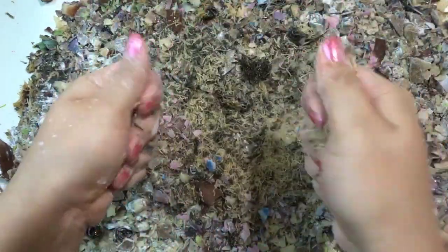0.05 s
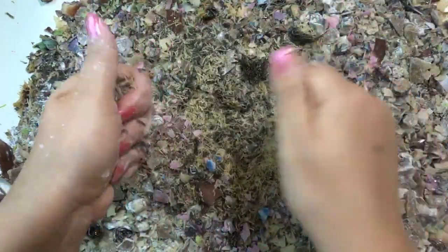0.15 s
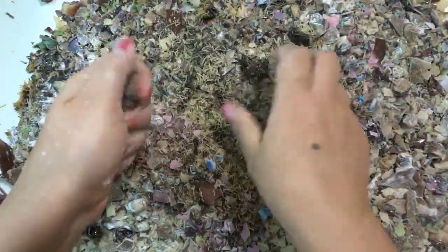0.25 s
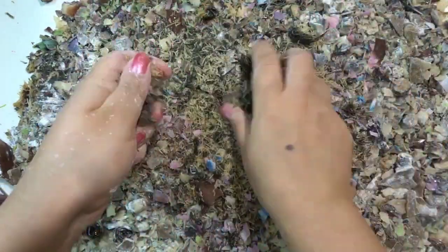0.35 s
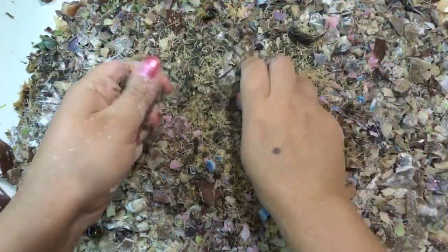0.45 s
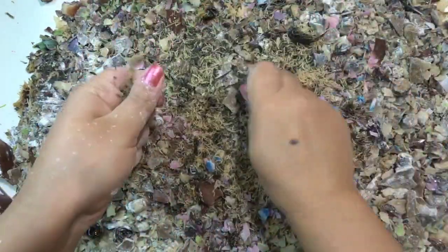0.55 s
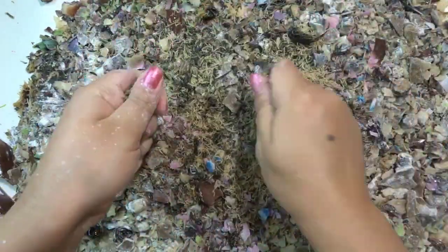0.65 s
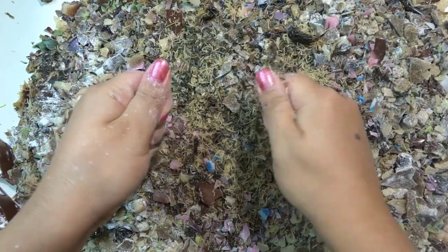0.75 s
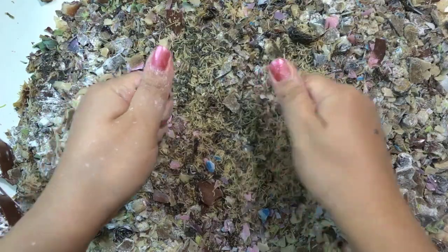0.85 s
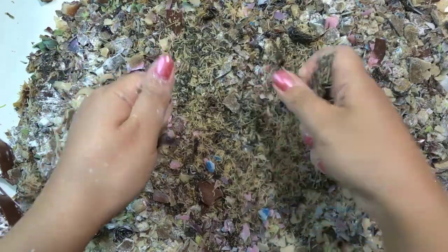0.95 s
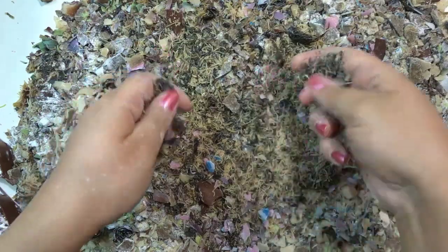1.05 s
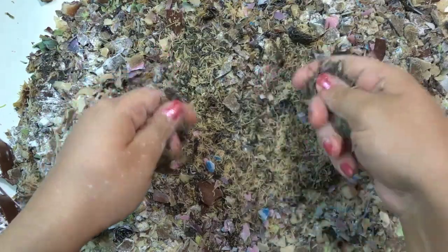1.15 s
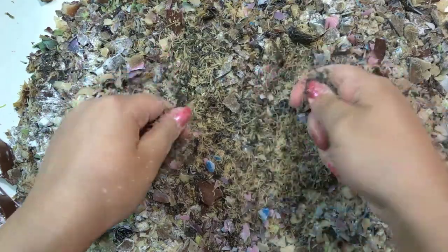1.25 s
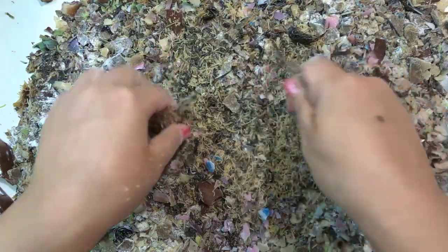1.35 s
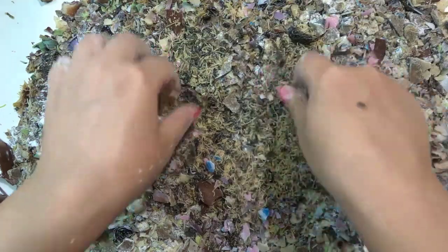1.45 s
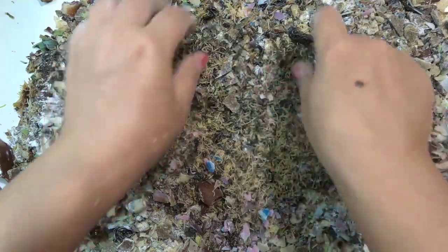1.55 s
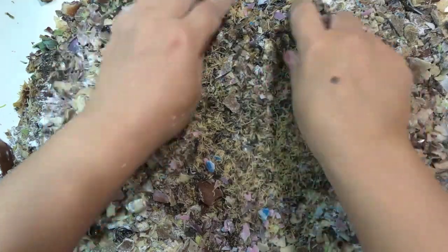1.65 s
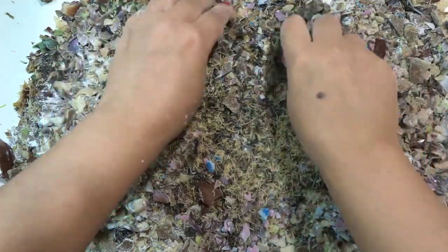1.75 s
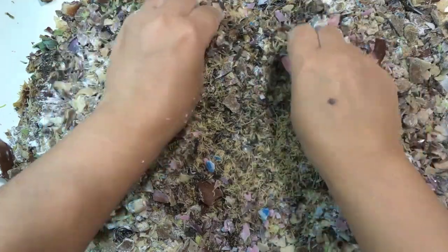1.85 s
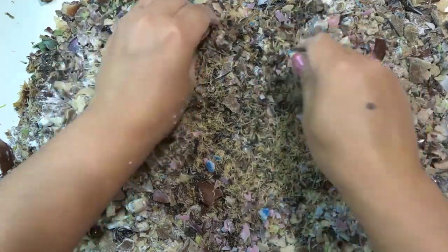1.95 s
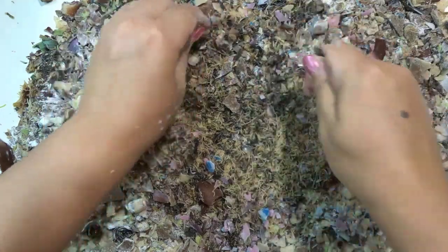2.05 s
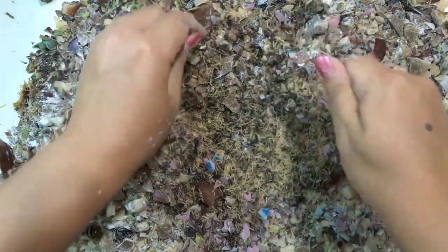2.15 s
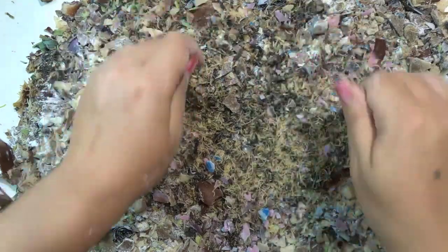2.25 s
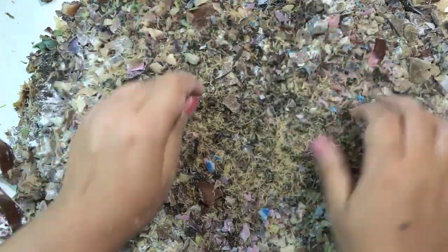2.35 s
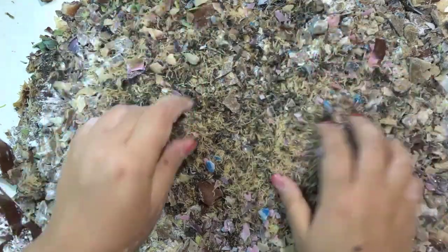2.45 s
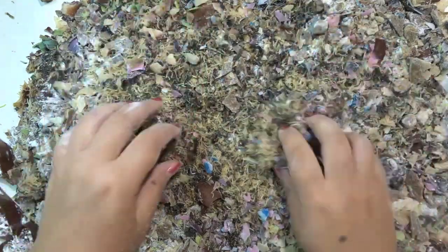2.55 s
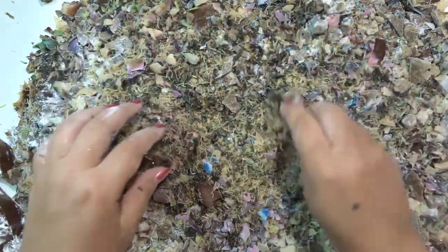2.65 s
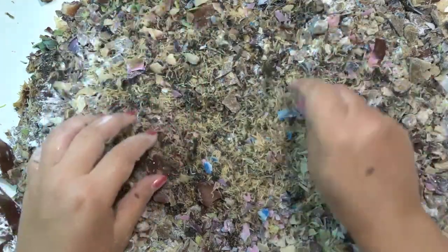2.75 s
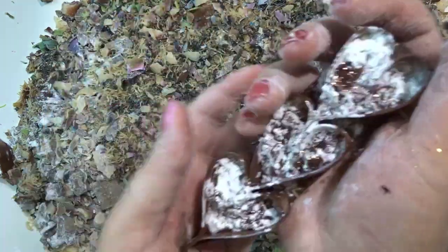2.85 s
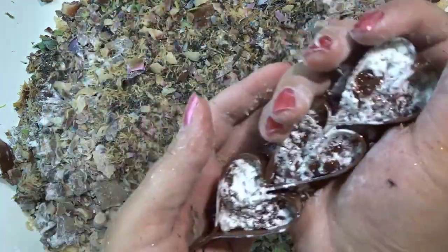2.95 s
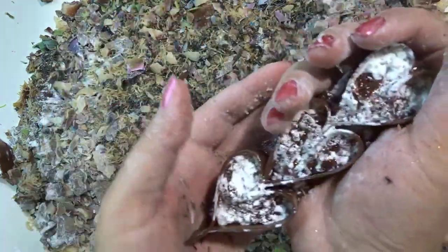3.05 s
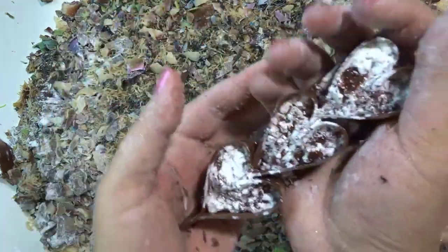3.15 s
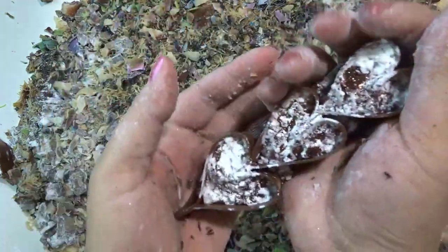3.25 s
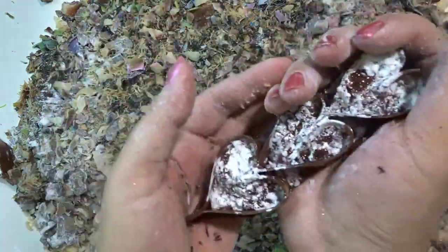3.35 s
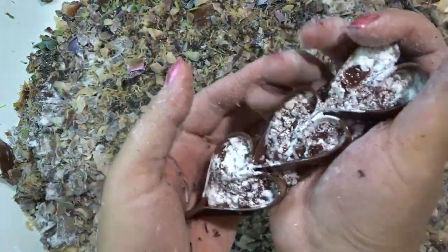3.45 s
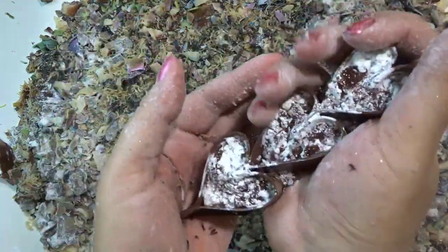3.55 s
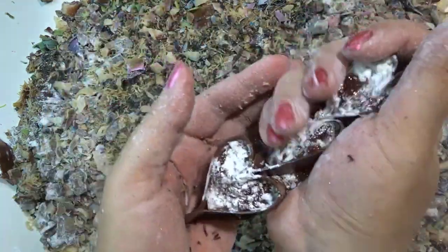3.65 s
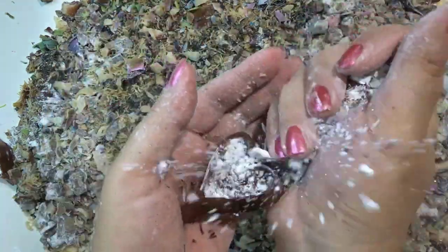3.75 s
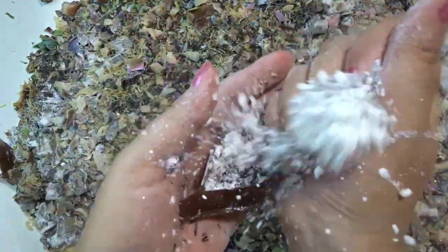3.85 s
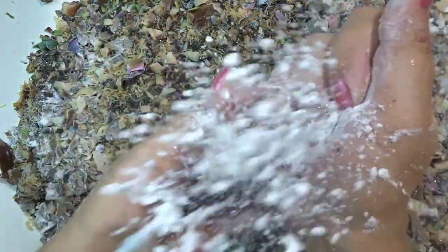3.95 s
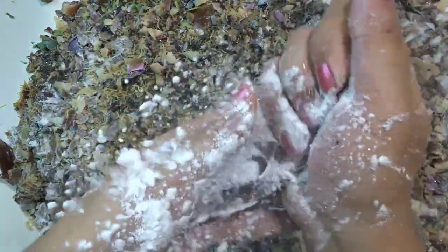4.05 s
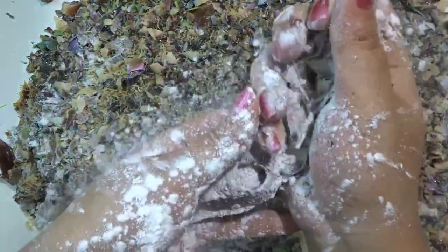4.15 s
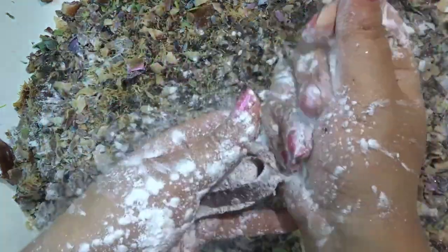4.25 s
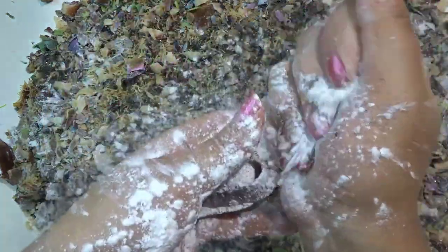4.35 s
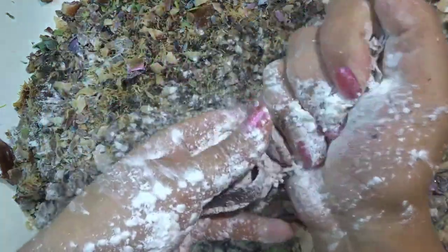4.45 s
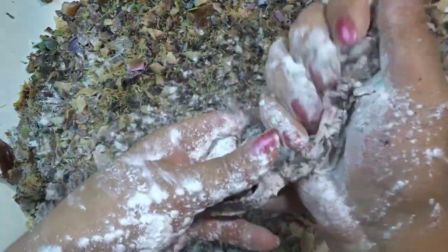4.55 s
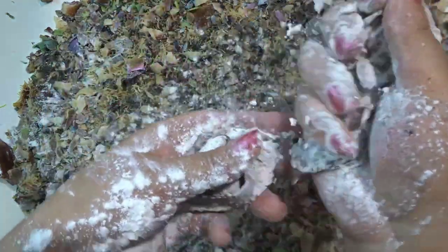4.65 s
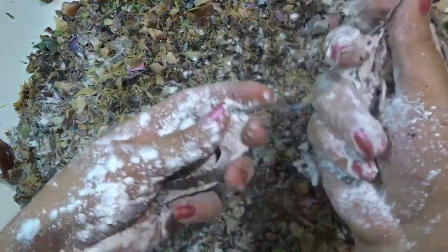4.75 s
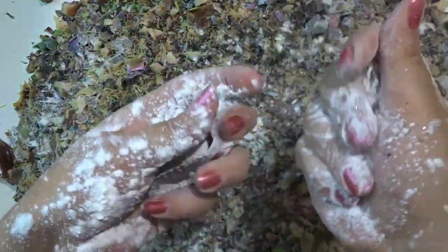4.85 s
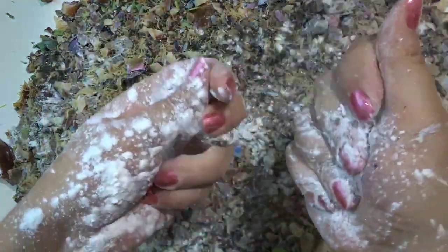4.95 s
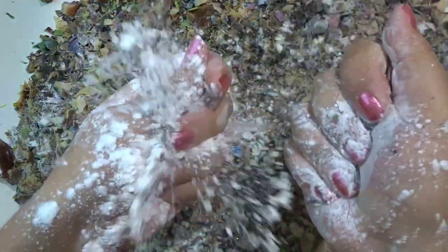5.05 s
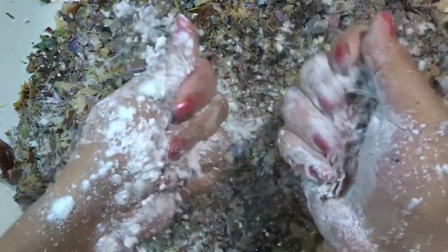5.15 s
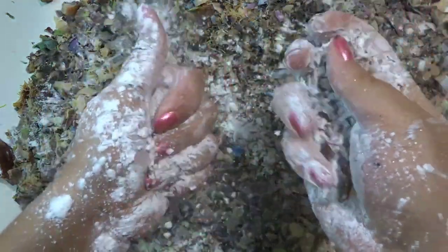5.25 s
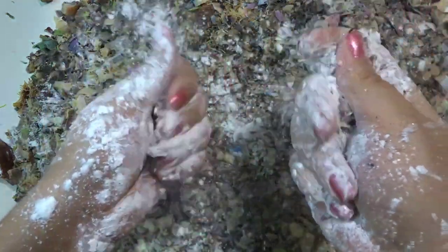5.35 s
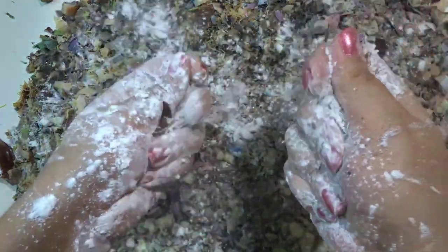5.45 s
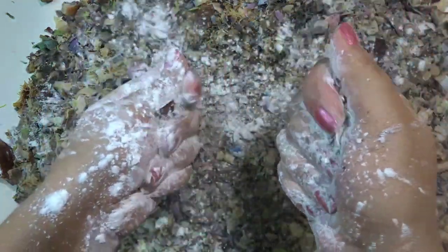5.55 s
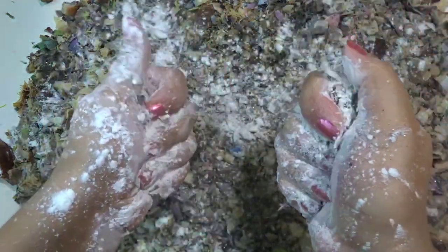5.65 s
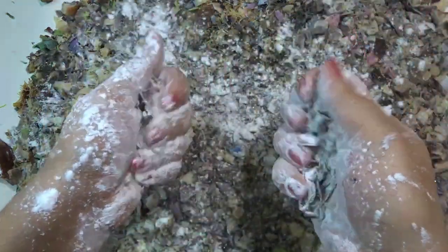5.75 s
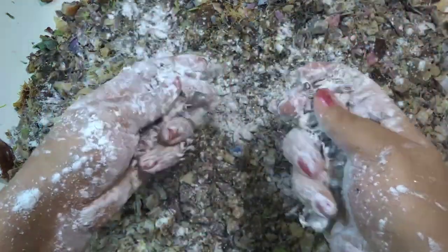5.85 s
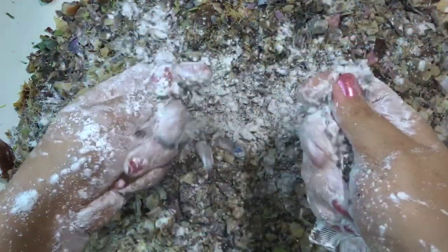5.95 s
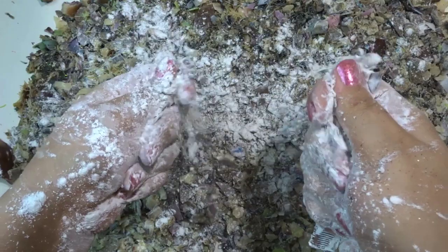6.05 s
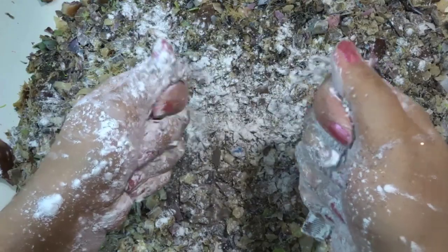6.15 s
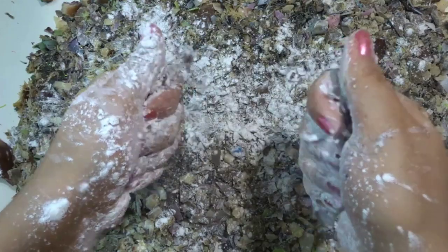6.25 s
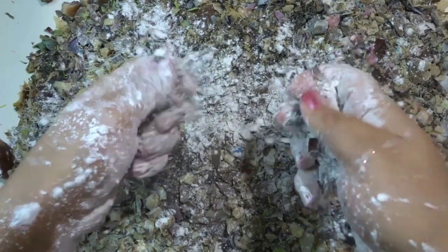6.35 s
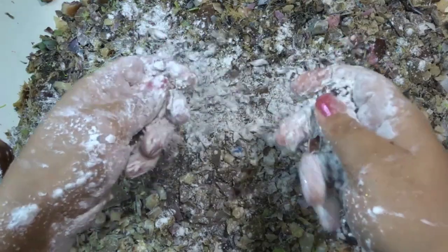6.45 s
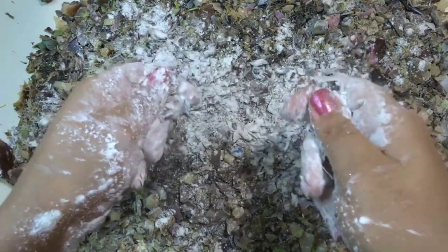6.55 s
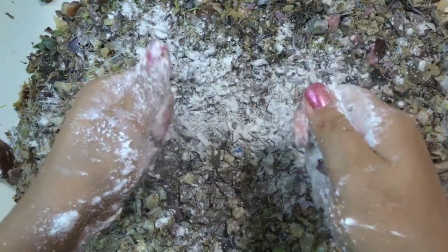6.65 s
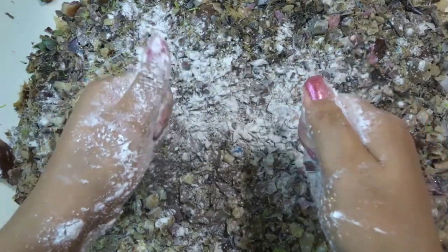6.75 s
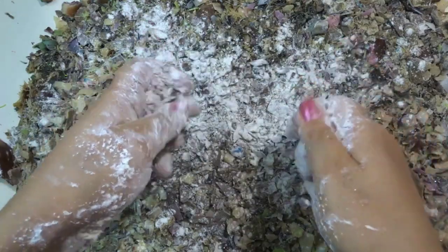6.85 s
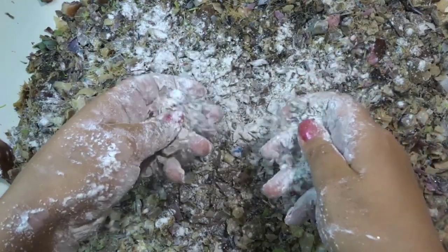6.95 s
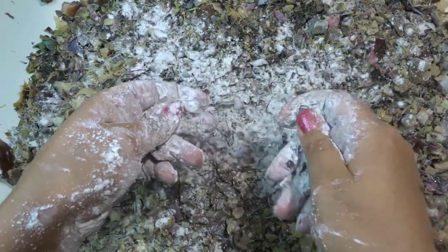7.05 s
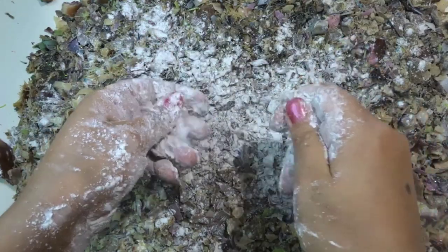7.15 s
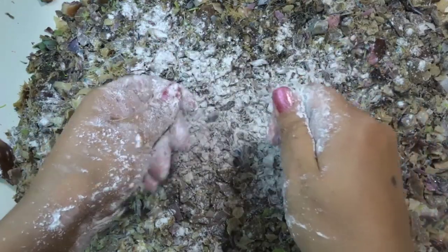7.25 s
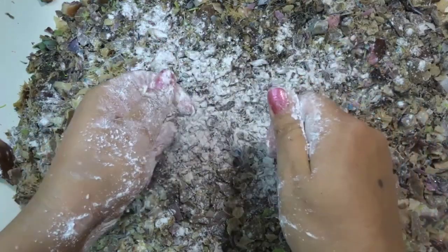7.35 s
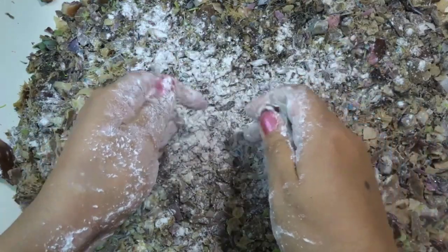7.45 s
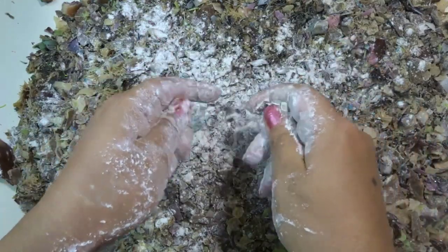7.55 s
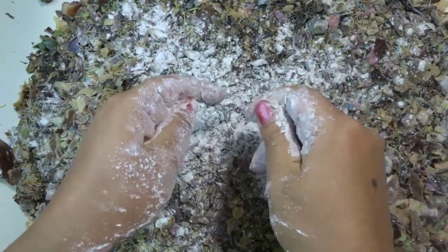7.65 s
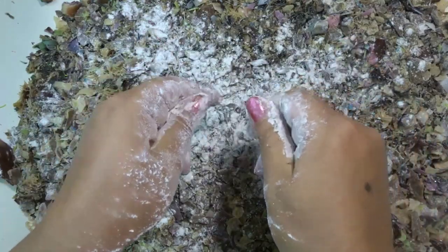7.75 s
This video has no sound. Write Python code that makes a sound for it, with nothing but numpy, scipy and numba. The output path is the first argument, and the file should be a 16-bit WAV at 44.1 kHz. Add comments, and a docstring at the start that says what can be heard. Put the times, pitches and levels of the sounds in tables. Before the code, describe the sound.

For the first three seconds, hands squeeze and rake dry soap crumbs on a tray, making fairly soft, crisp, gritty crunches with scattered small snaps. Fingers drag dully on the tray around 0.5 and 2.6 seconds, and arms bump the table very faintly. At 2.9 seconds the crunching cuts off abruptly, leaving low room hiss and a tiny trickle of crumbs. At 3.7 seconds brittle starch-filled soap shells break in a burst of sharp, slightly hollow cracks, the loudest moment, lasting until about 4.1. More dense crunching squeezes follow around 4.4 and 5.1 seconds, with faint thuds on the tray. Repeated crunches continue, gradually weakening, until about 6.8 seconds. The last second holds lighter, finer crackling and rubbing. Everything is very close to a stereo microphone in a quiet room with almost no echo.

```python
"""Dry soap crumbs and brittle starch-filled soap shells, raked, then crushed by two hands on a tray.
Each fracture is a short damped ring, deeper for big pieces; fractures burst as the grip gives way.
Single loud cracks stand out, close to a stereo microphone. The tray drones under dragging fingers,
arms knock the table faintly, and a quiet room hisses in a few narrow bands behind."""
import sys
import numpy as np
from scipy import signal
from scipy.fft import rfft, irfft, next_fast_len
from scipy.io import wavfile
from scipy.ndimage import uniform_filter1d
from numba import njit

SR = 44100
rng = np.random.default_rng(int(sys.argv[2]) if len(sys.argv) > 2 else 0)


def materialize(psi):
    """Save the field psi as 16-bit PCM at rate SR to the path in sys.argv[1].

    A 1-D psi becomes a single channel; in a 2-D psi each row is a channel.
    """
    bounded = np.clip(np.atleast_2d(psi).T, -1, 1)
    quanta = np.round(bounded * 32767).astype(np.int16)
    wavfile.write(sys.argv[1], SR, quanta)


N = 344421

# piece sizes: f_lo/Hz, f_hi/Hz, fractures/(1/s), ring/cycles, scatter/dB, grind/dB, snap/dB
SHARD = (1239, 2627, 1513, 7, -0.5, -4, -4.5)
CHUNK = (753, 1294, 980, 5, 0.5, -8.5, -5)
FLAKE = (2403, 5947, 3400, 4, 0, -2.5, -5)
DUST_GRAIN = (5632, 10786, 4443.5, 3.5, 3, -0.93, -19)
# rakes and squeezes: t_full/s, t_release/s, shards/dB, chunks re shards/dB, dust re shards/dB
HAND_MOVES = [(0.0, 0.088, -45.5, -13, -2.5), (0.122, 0.2, -42.5, -11.5, 1), (0.224, 0.46, -54.5, -4.5, 9),
              (0.574, 0.608, -47.5, 7.5, 5.5), (0.683, 0.77, -49, -3.5, 12.5),
              (0.828, 0.9, -49.5, -20, 5.5), (0.986, 1.22, -72.5, -3, 10), (1.241, 1.316, -54.5, -20, 5),
              (1.4, 1.83, -61.5, -10, 9.5), (1.817, 1.98, -49.5, -1, 3), (2.007, 2.146, -55, -15, 0),
              (2.216, 2.4, -66.5, -2, -0.5), (2.452, 2.44, -46, -18, 2.5), (2.557, 2.722, -42.5, 3.5, -7),
              (2.797, 2.83, -50, -7, -4), (3.755, 3.83, -36.5, -0.5, -6.5),
              (3.899, 3.876, -30.5, 7.5, -9.5), (3.986, 4.063, -24.5, 0, -21.5),
              (4.207, 4.26, -41.5, -32, -10.5), (4.346, 4.383, -25.5, -1, -21),
              (4.424, 4.523, -28, 1.5, -18.5), (4.63, 4.82, -56, -58, -6.5),
              (4.925, 4.99, -29, -3.5, -12.5), (5.057, 5.054, -25.5, 4, -7.5),
              (5.095, 5.18, -34, 1.5, -16.5), (5.233, 5.31, -30, 4.5, -17.5), (5.414, 5.606, -34.5, 1, -14),
              (5.65, 5.74, -28.5, 1.5, -20), (5.81, 5.78, -36.5, -6.5, -13),
              (5.998, 6.11, -34.5, -3.5, -15), (6.153, 6.25, -31.5, -4, -17),
              (6.31, 6.53, -46.5, -13, -2.5), (6.553, 6.81, -39.5, -7, -12), (6.923, 7.11, -62.5, -16, 3),
              (7.119, 7.18, -50.5, -32, -1.5), (7.266, 7.42, -45.5, -24, -6),
              (7.495, 7.76, -57.5, -23, 0.5), (7.65, 7.54, -50, -20, -11), (7.718, 7.8, -60, -32, 0.5)]
# balance of the hands: t/s, left minus right/dB
HAND_PAN = [(0.0, 2), (2.15, 0), (3.46, -2), (6.09, -0.5), (7.42, 1), (7.81, 2)]
# smooth raking to brittle squeezing: t/s, snap gain/dB
BRITTLENESS = [(0, 1), (1.7, -2), (2.45, -4), (2.95, -22), (3.7, 3), (5.5, 1), (6.9, -5), (7.1, 6),
               (7.6, 3)]
# crumbs trickling off the shell: t_full/s, t_release/s, level/dB
TRICKLES = [(3.233, 3.286, -69.5), (3.694, 3.69, -62)]
GRIP_DB_PER_S, RELEASE_DB_PER_S = 204, 165
CUT_FROM_S, CUT_UNTIL_S = 2.885, 3.693  # the crunching cuts off abruptly, then resumes


def hands(snaps_per_s=420, snap_cycles=1.45, snap_scatter_db=1.5):
    """Each size grinds on its own; a snapping piece sheds all sizes at one instant."""
    full_s, release_s, shards_db, chunks_db, dust_db = np.transpose(HAND_MOVES)
    pan_db, brittle_db = curve(HAND_PAN), curve(BRITTLENESS)
    slip_db = slips() + walk(18)
    snaps = fractures(snaps_per_s)
    heap, grinds = 0, []
    # chunks break only near full grip, so they come and go faster
    sizes = (SHARD, 0, 1), (CHUNK, chunks_db, 1.56), (FLAKE, 3 + 0.38 * dust_db, 1), (DUST_GRAIN, dust_db, 1)
    for piece, db, haste in sizes:
        lo_hz, hi_hz, per_s, cycles, scatter_db, grind_db, snap_db = piece
        grind = crumble(lo_hz, hi_hz, cycles, scatter_db, fractures(per_s), slip_db)
        grinds.append(grind)
        snap = crumble(lo_hz, hi_hz, snap_cycles, snap_scatter_db, snaps, 0.28 * slip_db, mix_db=5.5)
        grip = swells(full_s, release_s, shards_db + db, haste * GRIP_DB_PER_S, haste * RELEASE_DB_PER_S)
        heap = heap + grip * (undb(grind_db) * grind + undb(snap_db + brittle_db) * snap)
    t = np.arange(N) / SR
    outside_cut = np.clip(np.maximum(CUT_FROM_S - t, t - CUT_UNTIL_S) / 0.0052, 0, 1)
    trickle = sum(grinds[2:]) * swells(*np.transpose(TRICKLES), 120, 90)  # flakes and dust only
    return (heap * outside_cut + trickle) * undb(np.array([pan_db, -pan_db]) / 2)


def crumble(lo_hz, hi_hz, cycles, scatter_db, draws, slip_db, mix_db=0, lag_s=2.5e-5):
    """Swarm of ringing fractures spread over both palms, at unit RMS."""
    when, big, sign, lag, pan = draws
    pitch, ring, share = rng.random((len(when), 3)).T
    start = when * (N - 1)
    drift = np.tanh(walk(14))[start.astype(int)]  # like sizes break together: the colour wanders
    hz = lo_hz * (hi_hz / lo_hz) ** np.clip(pitch + 0.25 * drift * np.sin(np.pi * pitch), 0, 1)
    size_db = -scatter_db * np.log(1.03 - big) + slip_db[start.astype(int)] + mix_db * share
    size = undb(size_db) * np.sign(sign - .5)
    size *= (hz / lo_hz) ** 0.65  # thin pieces ring briefly, so snap harder
    pan_db = 12.5 * pan * np.minimum(hz / 3000, 1)
    swarm = stereo_rings(start, hz, cycles * (.5 + ring), size, lag * lag_s * SR, pan_db)
    return level(band(swarm, 0.99 * lo_hz, 1.294 * hi_hz, order=3), 0)


def fractures(per_s):
    """Draws per fracture: uniform time, size, sign; normal lag, pan."""
    count = int(per_s * N / SR)
    return np.vstack([rng.random((count, 3)).T, rng.standard_normal((count, 2)).T])


def slips(per_s=160, settle_s=0.0066, scatter_db=3.3, creep=5):
    """The heap creeps, gives suddenly and settles; gain in dB."""
    when, big = rng.random((int(per_s * N / SR), 2)).T
    kicks = np.bincount((when * N).astype(int), undb(-scatter_db * np.log(1.01 - big)), N)
    settling = signal.lfilter([1], [1, -np.exp(-1 / (settle_s * SR))], kicks)
    return 20 * np.log10(creep + settling)


# single loud cracks: t/s, level/dB, f/Hz, splinter gain/dB, left minus right/dB
SHELL_CRACKS = [(0.13, -22.5, 3440, -27, 2), (0.189, -26, 1940, -25, -4), (0.351, -28, 5500, -8, 12),
                (0.464, -26, 5760, -44, 6), (0.72, -27, 7040, -29, 0), (0.765, -20.5, 5700, -10, -1),
                (0.833, -29, 2330, -32, -5), (0.849, -29, 6160, -25, 0), (0.917, -33, 6500, -16, 0),
                (1.327, -29.5, 5100, -31, -8), (1.824, -32, 5160, -7, 2), (1.924, -24.5, 3900, -15, 0.5),
                (2.403, -35, 5000, -12, -3), (2.412, -22, 2050, -18, -8), (2.412, -24, 4070, -5, -1),
                (2.431, -35, 1610, -16, -7), (2.822, -33, 6370, -25, 1), (3.27, -44.5, 2300, -7, 8),
                (3.697, -17.5, 2130, -49, -3.5), (3.706, -30, 1900, -20, -2.5), (3.728, -25, 2000, -18, 1),
                (3.733, -2.5, 1920, -35, -2.5), (3.742, -13.5, 1970, -10, 6), (3.749, -6, 1620, -4.5, 2),
                (3.778, -10, 2020, -35, -4), (3.783, -12.5, 2030, -4, 1), (3.827, -5, 3270, -10.5, 1),
                (3.833, -8, 1510, -12, -4.5), (3.886, -21, 1390, -5, 3), (3.901, -5, 1620, -30, 0),
                (3.906, -11.5, 1920, -31, 2), (3.959, -9, 970, -28, -1), (4.036, -9.5, 1700, -33, -1),
                (4.246, -24.5, 2500, -29, -6), (4.321, -17.5, 900, -5.5, -2.0), (4.369, -16, 3930, -10, -3),
                (4.438, -10.5, 1320, -14, -1), (4.423, -14, 1220, -22, -2.5), (4.485, -10.5, 1530, -22, -2),
                (4.517, -9, 1660, -18.5, -4), (4.921, -23, 1600, -30, -7), (4.963, -17, 2659, -7, -1.5),
                (5.048, -8, 940, -6.5, 3), (5.053, -11, 910, -8, -0.5), (5.061, -4, 1730, -23, -1.5),
                (5.144, -16.5, 840, -24, 1), (5.188, -17.5, 3680, -18, 4), (5.292, -10, 1180, -23, -2),
                (5.371, -24, 3005, -4, -7), (5.382, -21.5, 3600, -9, -2), (5.447, -23, 1290, -6.5, -4),
                (5.53, -18, 990.5, -25, -3), (5.736, -12.5, 1400, -14, -2), (5.778, -19.5, 1270, -18, -1.5),
                (5.823, -20.5, 1643, -22, -4), (5.834, -21.5, 1140, -20, 5),
                (6.067, -15.5, 1240, -15, -5.5), (6.184, -19.5, 1260, -24, -6), (6.344, -27, 1840, -23, -5),
                (6.443, -24.5, 2970, -4.5, 1.5), (6.566, -27.5, 3840, -4, -2), (7.127, -27, 5438, -8, 5),
                (7.164, -28, 3810, -8, 2), (7.249, -26, 3000, -2, 6), (7.313, -21.5, 3070, -14, 2),
                (7.666, -37, 4400, -9, 2)]


def cracks(snaps=10, run_s=0.0042, splinter_hz=4800, hollow_hz=823, strong_db=-13):
    """A shell snaps with a ring and a bright splinter; the crack runs on in smaller snaps."""
    t_s, db, hz, splinter_db, pan_db = np.repeat(SHELL_CRACKS, snaps, axis=0).T
    wait, sign = rng.random((len(t_s), 2)).T
    detune, lag = rng.standard_normal((len(t_s), 2)).T
    first = np.arange(len(t_s)) % snaps == 0
    delay = np.where(first, 0, -np.log(1 - wait))
    start = (t_s + 0.000708 + run_s * delay) * SR
    size = undb(db + np.where(first, 4.6, -11 - 6 * delay)) * np.sign(sign - .5)
    body_hz = hz * np.exp(0.67 * np.clip(detune, -0.7, 2) * ~first)
    body = stereo_rings(start, body_hz, 0.68 + 0.0013 * hz, size, 1.3 * lag, pan_db)
    splinter = stereo_rings(start, splinter_hz * np.exp(0.16 * detune * ~first), np.full(len(t_s), 2.8),
                            size * undb(splinter_db + 8.5), 1.5 * lag, pan_db)
    knock = first * (db > strong_db) * undb(db - 5.5)  # strong cracks knock the cupped shell
    hollow = stereo_rings(start, hollow_hz * np.exp(0.048 * detune), np.full(len(t_s), 3.0),
                          knock, lag, pan_db)
    return band(body + splinter + hollow, 700, 10000, order=3)


# fingertip rubs: t_full/s, t_release/s, level/dB
SHARD_RUBS = [(0.113, 0.194, -44.5), (0.835, 0.89, -43), (7.55, 7.615, -61), (7.704, 7.785, -50)]


def rubs(lo_hz=1650, hi_hz=2350, per_s=2500, cycles=26.0, scatter_db=1.2):
    """Shards slide over each other in dense, even rings."""
    swarm = crumble(lo_hz, hi_hz, cycles, scatter_db, fractures(per_s), 2.2 * walk(40))
    return swarm * swells(*np.transpose(SHARD_RUBS), GRIP_DB_PER_S, RELEASE_DB_PER_S)


# fingers, palms and pieces on the tray: t_full/s, t_release/s, drag/dB, thud/dB
TRAY_TOUCHES = [(0.345, 0.407, -61, -68), (0.53, 0.573, -44.5, -74), (1.812, 1.939, -51, -66.5),
                (2.532, 2.708, -42.5, -64), (3.896, 3.992, -40.5, -41.5), (4.355, 4.43, -51, -55),
                (5.061, 5.12, -50, -42.5), (5.247, 5.29, -55, -56.5), (5.697, 5.758, -56, -51),
                (6.16, 6.203, -59, -60), (7.13, 7.19, -61.5, -94)]
# drag mode, thud mode: f/Hz, width/Hz
TRAY_RESONANCES = [(481, 85), (311, 93)]


def tray(rise_db_per_s=260, fall_db_per_s=249, rest_db=-78.5):
    """Dragging shakes the tray's higher mode, thuds the lower."""
    full_s, release_s, *levels_db = np.transpose(TRAY_TOUCHES)
    out = 0
    for (hz, width_hz), db in zip(TRAY_RESONANCES, levels_db):
        friction = narrow(rng.standard_normal((2, N)) * undb(1.8 * walk(70)))
        mode = band(friction, hz - width_hz / 2, hz + width_hz / 2, order=1)
        mode = band(mode, 0.47 * hz, 1.38 * hz)
        force = swells(full_s, release_s, db, rise_db_per_s, fall_db_per_s) + undb(rest_db)
        out = out + level(mode, 0) * force
    return out


# falling pieces: t/s, level/dB, f/Hz
PIECE_DROPS = [(3.776, -33.5, 298), (6.064, -32.5, 317), (6.444, -39, 467)]


def drops(cycles=4.0):
    """A piece lands and the tray rings briefly."""
    t_s, db, hz = np.transpose(PIECE_DROPS)
    return band(rings(t_s * SR, hz, np.full(len(t_s), cycles), undb(db)), 180, 600)


# arms on the table: t_full/s, t_release/s, level/dB
ARM_KNOCKS = [(0.318, 0.418, -60.5), (1.096, 1.1, -53.5), (1.455, 1.586, -61), (1.768, 2.2, -68),
              (2.573, 2.75, -60), (3.453, 3.52, -68)]


def table_knocks(rise_db_per_s=196, fall_db_per_s=142):
    """Arms shake the table's low modes."""
    rumble = level(band(narrow(rng.standard_normal((2, N))), 30, 126), 0)
    return rumble * swells(*np.transpose(ARM_KNOCKS), rise_db_per_s, fall_db_per_s)


def echo(x, t60_s=0.096, wet_db=-10):
    """Tray, palms and walls scatter each snap into a short tail, the same in both channels."""
    t = np.arange(SR // 8) / SR
    tail = rng.standard_normal((2, len(t))).sum(axis=0) * undb(-60 * t / t60_s)
    tail *= undb(wet_db) / np.linalg.norm(tail)
    return x + signal.fftconvolve(x, tail[None], axes=1)[:, :N]


# air spectrum: f/Hz, relative density/dB
AIR_SPECTRUM = [(27, -2), (45, -6), (150, -4), (390, -4.5), (450, -6.5), (1000, -19), (6500, -30),
                (11000, -25.5)]
# hiss bands: f/Hz, half-width/Hz, relative level/dB
HISS_BANDS = [(1464, 130, -1), (2407, 130, 4.5), (3450, 95, -12), (4450, 160, -10), (5840, 440, -18)]


def room(air_db=-66, hiss_db=-59, shared_below_hz=720):
    """Steady air noise, shared in the bass, and wavering hiss bands that differ left and right."""
    size = next_fast_len(N)
    hz = np.arange(size // 2 + 1) * SR / size + 1
    mid, side = rfft(rng.standard_normal((2, size)))
    coherence = 1 / (1 + (hz / shared_below_hz) ** 2)
    noise = np.sqrt(1 + coherence) * mid + np.sqrt(1 - coherence) * np.array([side, -side])
    knot_hz, knot_db = np.transpose(AIR_SPECTRUM)
    colour = undb(np.interp(np.log(hz), np.log(knot_hz), knot_db))
    air = irfft(colour * noise, size)[:, :N]
    white = rfft(rng.standard_normal((2, size)))
    hiss = 0
    for centre_hz, half_hz, db in HISS_BANDS:
        shape = (1 + ((hz - centre_hz) / half_hz) ** 4) ** -.5
        hiss = hiss + irfft(white * shape, size)[:, :N] * undb(db + 3.4 * walk(8))
    return level(air, air_db) + level(hiss, hiss_db)


@njit
def rings(start, hz, cycles, size):
    """Damped sines, down by e every cycles / 2 periods; start in fractional samples."""
    out = np.zeros(N)
    for k in range(len(hz)):
        pole = (2j * np.pi - 2 / cycles[k]) * hz[k] / SR
        onset = max(int(np.ceil(start[k])), 0)
        phasor, step = size[k] * np.exp(pole * (onset - start[k])), np.exp(pole)
        opening = np.exp(-6 * hz[k] / SR)  # the break opens in about a third of a period
        shut = opening ** (onset - start[k])
        for j in range(onset, min(N, onset + int(3 * cycles[k] * SR / hz[k]))):
            out[j] += (1 - shut) * phasor.imag
            shut *= opening
            phasor *= step
    return out


def stereo_rings(start, hz, cycles, size, lag, pan_db):
    """Rings offset in time (lag, samples) and level between the channels."""
    return np.array([rings(start + side * lag, hz, cycles, size * undb(side * pan_db))
                     for side in (.5, -.5)])


def swells(full_s, release_s, db, rise_db_per_s, fall_db_per_s):
    """Gain of events that rise, hold and fall, summed in power."""
    t = np.arange(0, N, 32) / SR
    before_db = rise_db_per_s * np.maximum(full_s[:, None] - t, 0)
    after_db = fall_db_per_s * np.maximum(t - release_s[:, None], 0)
    gain = np.linalg.norm(undb(db[:, None] - before_db - after_db), axis=0)
    return np.interp(np.arange(N) / SR, t, gain)


def walk(per_s):
    """Slewed random steps, spread near 1."""
    hold = int(SR / per_s)
    return uniform_filter1d(np.repeat(rng.standard_normal(N // hold + 1), hold), hold // 2 + 1)[:N]


def narrow(mid_side, width=0.2):
    """Mid and side to nearly equal left and right."""
    return np.array([[1, width], [1, -width]]) @ mid_side


def curve(table):
    return np.interp(np.arange(N) / SR, *np.transpose(table))


def band(x, lo_hz, hi_hz, order=2):
    sos = signal.butter(order, [lo_hz, min(hi_hz, .45 * SR)], "band", fs=SR, output="sos")
    return signal.sosfilt(sos, x)


def level(x, rms_db):
    return x * undb(rms_db) / np.sqrt(np.mean(x ** 2))


def undb(db):
    return 10 ** (np.asarray(db) / 20)


def scene():
    """Soap with its echo, over table, tray and room."""
    return echo(hands() + rubs() + cracks()) + table_knocks() + tray() + drops() + room()


def record(dry, drive=0.6, input_top_hz=11050, output_top_hz=15000):
    """The input stage cuts the treble steeply; the loudest cracks overload it and spit above the cut."""
    def cut(x, hz):
        return signal.sosfilt(signal.ellip(10, .2, 60, hz, fs=SR, output="sos"), x)
    overloaded = np.tanh(drive * cut(dry, input_top_hz)) / drive
    return cut(overloaded, output_top_hz)


dry = scene()
out = record(dry)
materialize(out)
```